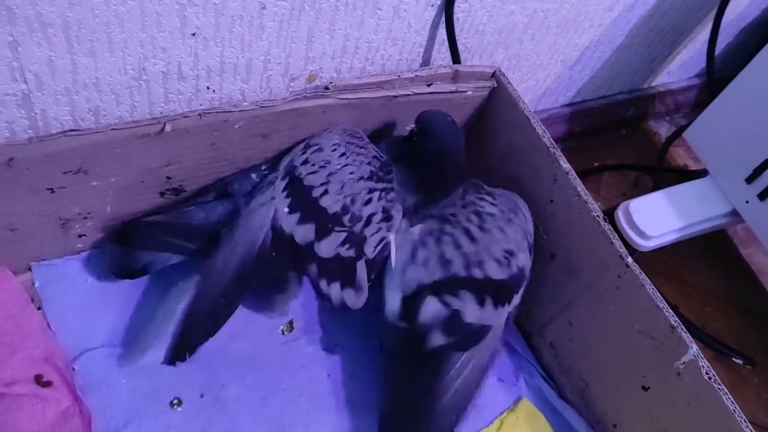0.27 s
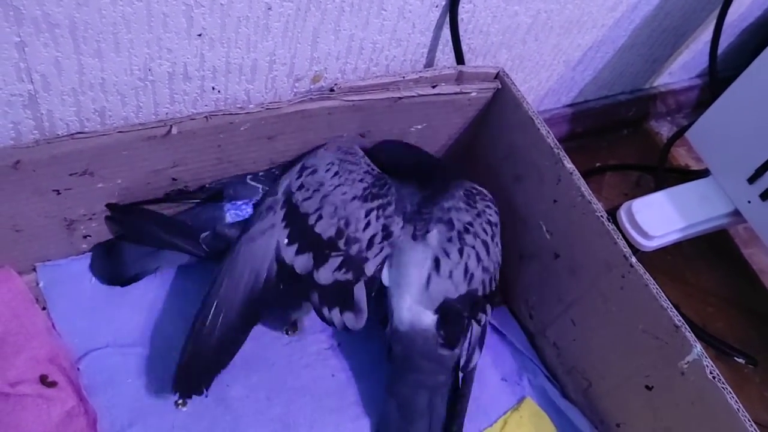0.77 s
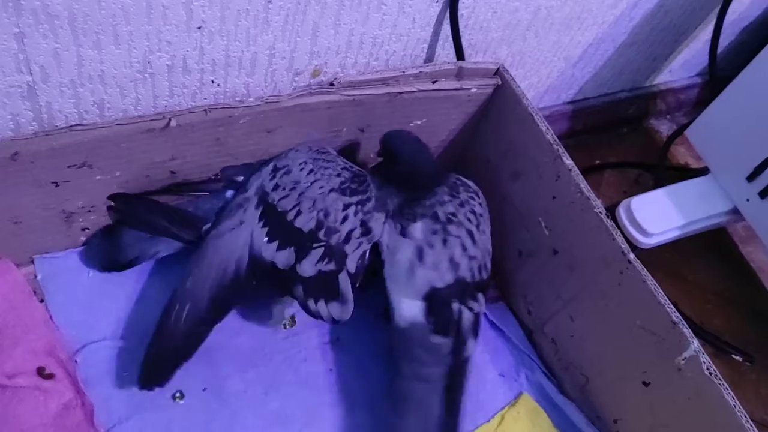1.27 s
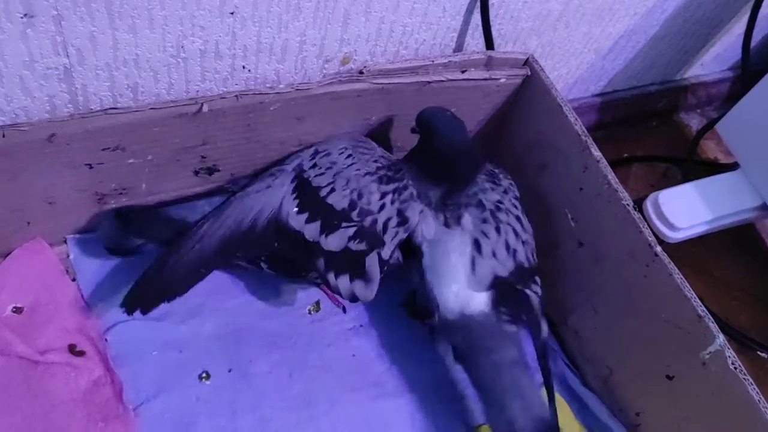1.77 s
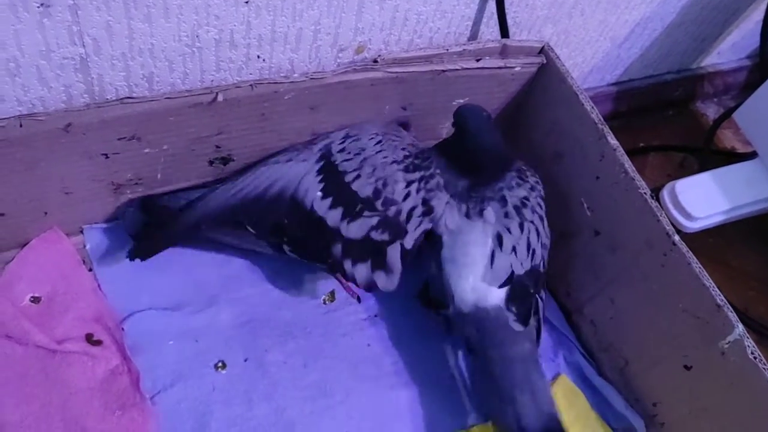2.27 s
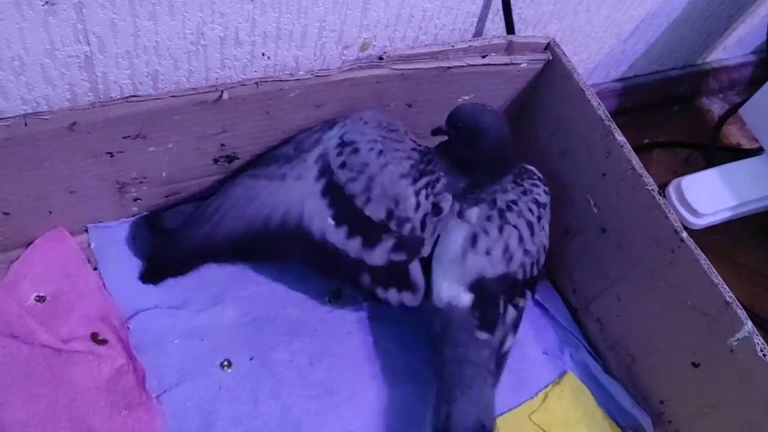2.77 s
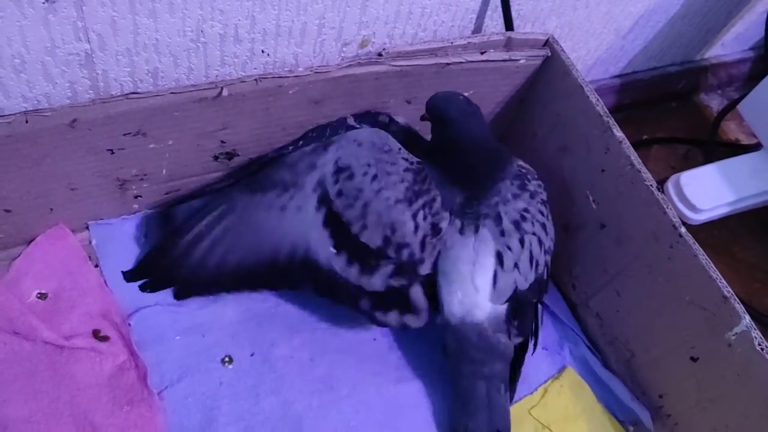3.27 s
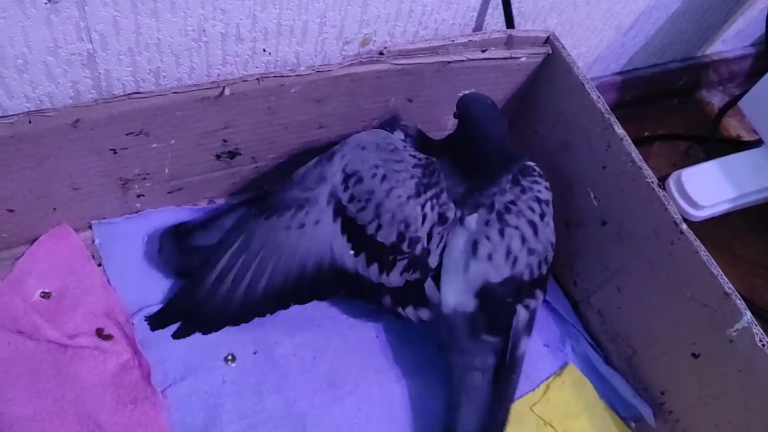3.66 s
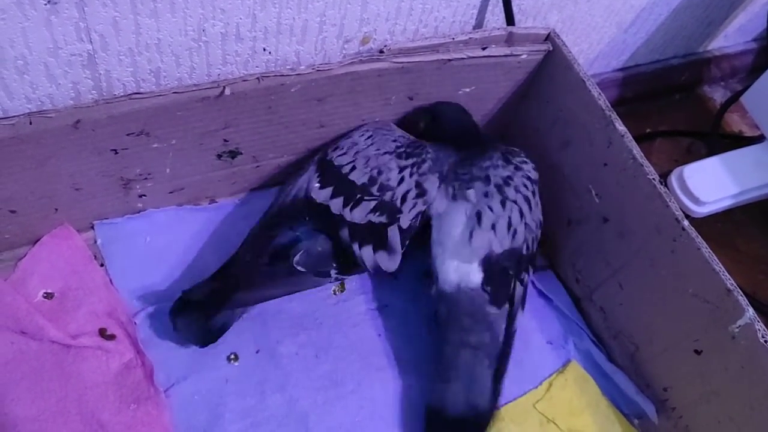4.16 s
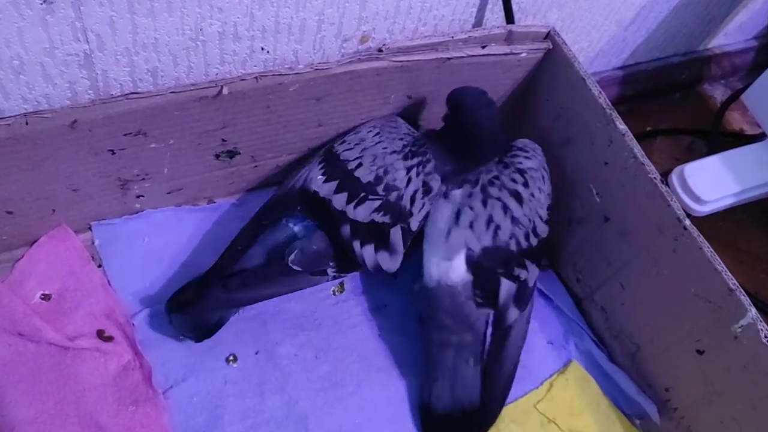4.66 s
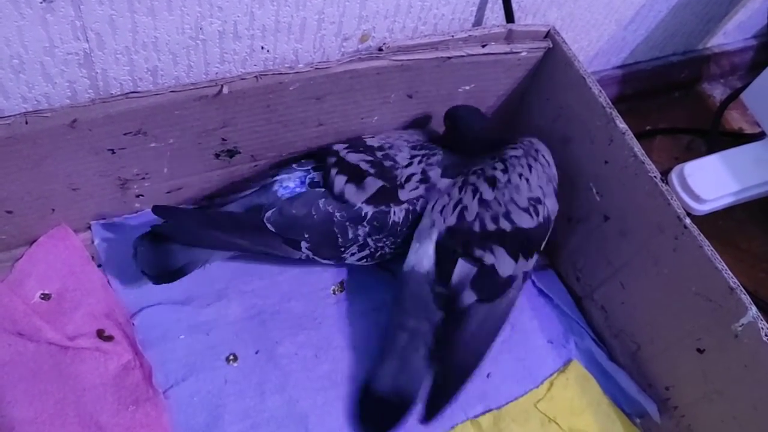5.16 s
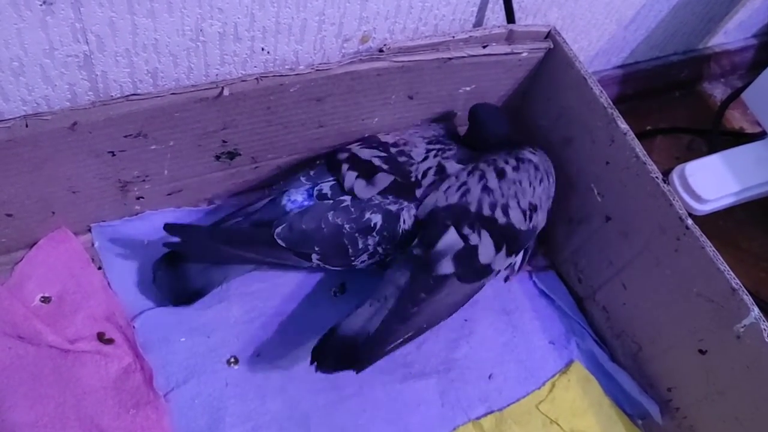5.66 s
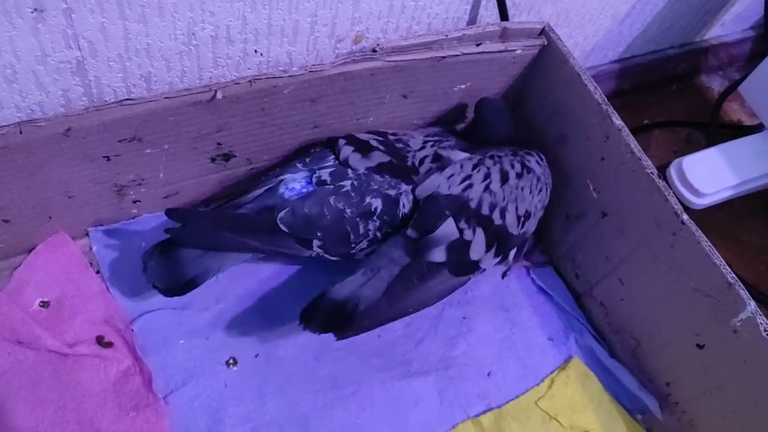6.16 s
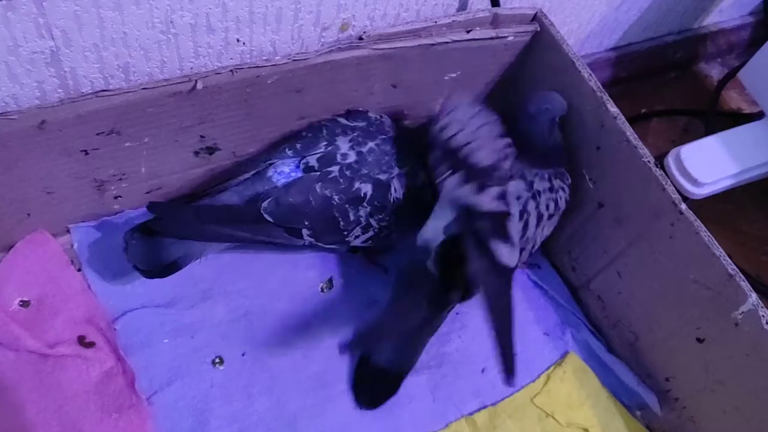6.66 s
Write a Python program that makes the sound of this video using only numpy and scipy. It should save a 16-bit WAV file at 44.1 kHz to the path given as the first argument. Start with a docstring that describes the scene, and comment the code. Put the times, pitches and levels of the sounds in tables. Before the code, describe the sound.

Two pigeons scuffle in a cardboard box, wings slapping and feathers hissing over hollow knocks and hoarse low coos, with bumps on the microphone.

```python
"""Two pigeons wrestle in the corner of a cardboard box in a small room.
Their feathers rub as grainy, patchy hiss; wings and claws swish, knock, crunch and scratch the ringing cardboard.
One bird gives short, hoarse, low coos: a few wavering partials with growl and raspy breath noise.
The hand-held recorder has a right port that rings in the treble; its left port is dull.
A finger bumps on the left port with falling thuds and creeps over it, and the grip rumbles."""
import sys
import numpy as np
from scipy import signal
from scipy.fft import rfft, irfft, next_fast_len
from scipy.io import wavfile

SR = 44100
rng = np.random.default_rng(int(sys.argv[2]) if len(sys.argv) > 2 else 0)


def output_pcm(signal):
    """Save a mono or channel-first signal as 16-bit PCM at the path in sys.argv[1].

    Samples are clipped to [-1, 1] before scaling.
    """
    pcm = np.clip(np.atleast_2d(signal).T, -1, 1) * 32767
    wavfile.write(sys.argv[1], SR, np.round(pcm).astype(np.int16))


N = 304731
TIME = np.arange(N) / SR   # seconds

# All levels in the tables are relative within their layer; the colours and mix gains come on top.

# Spectrum of the room tone: (frequency [Hz], level [dB])
ROOM_TONE_COLOUR = [(20, -29), (90, -46), (160, -48), (300, -61.5), (500, -52), (1000, -63), (3000, -70.5),
                    (8000, -81.5), (16000, -99.5)]
# Grip on the recorder, tightening towards the end: (time [s], rumble level [dB])
GRIP = [(0.0, -58.5), (5.7, -55), (5.92, -40), (6.15, -51), (6.74, -44), (6.91, -43.5)]
# Spectrum of the grip rumble: (frequency [Hz], level [dB])
RUMBLE_COLOUR = [(12, 20.5), (30, 40), (50, 31.5), (90, 24), (160, 17), (250, 12.5), (500, -7.5),
                 (1200, -26.5), (4000, -40)]
# Finger bumps on the left port: (time [s], level [dB], start pitch [Hz], decay constant [s])
FINGER_BUMPS = [(2.157, -22.5, 245, 0.017), (2.582, -24.5, 407, 0.022), (3.578, -29.5, 380, 0.022),
                (3.603, -27.5, 132, 0.028), (4.149, -32, 125, .038), (4.285, -37, 282, 0.039),
                (4.63, -29.5, 87.6, .035), (4.676, -36.5, 166, 0.016), (5.288, -34.5, 139, 0.036),
                (5.595, -31, 70, 0.018), (5.789, -4.5, 490, 0.009), (5.841, -19, 760, 0.03),
                (5.8769, -18.5, 730, 0.016), (5.956, -19.5, 767, 0.022), (6.77, -28.5, 270, 0.022),
                (6.831, -23.5, 180, 0.0089), (6.905, -15, 480, 0.03)]
# Finger over the left port: (time [s], covered share [0-1])
FINGER_COVER = [(0, 0), (3.6, 0.41), (4.3, 0.74), (5.6, 0.47), (6.9, 0.95)]
# Response of the open left port: (frequency [Hz], gain [dB])
LEFT_PORT_COLOUR = [(100, 0), (400, 7), (700, 5.5), (1050, 2.5), (1500, -3.5), (2500, -3), (4000, -7),
                    (7000, -11), (10000, -12.5), (14000, -3), (16000, -23)]
# Coos: (time [s], length [s], pitch before bending [Hz], level [dB], rasp relative to the tone [dB])
COOS = [(1.47, .35, 209, -48, -10), (2.02, .31, 210, -49, -7), (2.65, .35, 194, -54, -5.5),
        (3.61, .21, 216.1, -51, -7.5), (5.718, .34, 226, -50.5, -6), (6.35, .36, 211, -49.5, -7.5)]
# Partials of a coo: (multiple of the pitch [ratio], level [dB])
COO_PARTIALS = [(1, -3.5), (2, -19), (3, -34)]
# Resonances of the cardboard box: (frequency [Hz], level [dB], decay by 60 dB [s])
BOX_MODES = [(97.8, 1, 0.16), (162.3, -3, 0.31), (191.7, 5, 0.072), (259, 2.5, 0.095), (317, -4.5, 0.2),
             (596, -2.5, 0.098), (624, 12.5, 0.0082), (710, 0.5, 0.074), (796, 2, 0.046), (995, -4.5, 0.1),
             (1160, -9, 0.088), (1330, 1, 0.019), (1780, -5, 0.018), (2660, 9.5, 0.011)]
# Spectrum of the cardboard crunch: (frequency [Hz], level [dB])
CRUNCH_COLOUR = [(100, -17), (300, -2.5), (550, 11), (750, 9), (1050, 4.5), (1400, 5.5), (2000, 6),
                 (3200, 1), (6000, -12), (16000, -42.5)]
# Claws and beaks scratching the cardboard: (time [s], level [dB], pitch [Hz])
SCRATCHES = [(0.128, -29.5, 2030), (0.335, -42, 1990), (0.675, -45, 1510), (1.138, -24.5, 743),
             (1.285, -46, 1635), (1.401, -45.5, 1086), (1.551, -42.5, 2960), (1.777, -39.5, 1590),
             (3.754, -51.5, 4240), (4.898, -54.5, 6200), (5.105, -57, 2150), (5.983, -40.5, 1360),
             (6.178, -38.5, 1500)]
# Wing strokes and pecks; length is the rise time plus the decay constant of the swish:
# (time [s], length [s], feather swish [dB], knock on the wall [dB], thump of the box [dB])
WING_STROKES = [(0.118, 0.0091, -23.5, -34, -26.5), (0.32, 0.011, -33.5, -39.5, -35),
                (0.671, .03, -60, -58, -70), (0.808, 0.031, -41.5, -65, -51.5),
                (1.135, 0.0048, -18, -29.5, -34), (1.305, .016, -39.5, -45.5, -41),
                (1.463, 0.018, -38.5, -43.5, -44.5), (1.551, 0.0056, -32.5, -53, -63),
                (1.776, 0.03, -39.5, -63, -42), (1.993, 0.026, -36.5, -74, -59),
                (2.143, 0.025, -31, -45.5, -39.5), (2.307, 0.023, -33.5, -52.5, -49.5),
                (2.451, 0.015, -28.5, -41, -38), (2.916, 0.013, -27.5, -38.5, -36.5),
                (3.278, 0.036, -37.5, -44, -46), (3.469, 0.01, -35.5, -54.5, -59),
                (3.667, 0.016, -51, -51.5, -49), (3.706, .015, -58, -50.5, -45.5),
                (3.961, 0.029, -50.5, -70, -54), (4.309, 0.013, -44.5, -74, -51.5),
                (4.829, 0.0075, -45.5, -57, -38), (5.652, 0.0099, -43, -74, -54),
                (5.792, 0.016, -45.5, -48.5, -58), (5.939, .018, -46, -53, -51),
                (5.98, 0.0067, -34.5, -49, -43), (6.078, 0.021, -45, -67, -60),
                (6.177, 0.0034, -37.5, -46.5, -38.5), (6.446, 0.0096, -35.5, -74, -57)]
# Spectrum of the wing swishes: (frequency [Hz], level [dB])
SWISH_COLOUR = [(150, -2.5), (700, -1), (2000, -7.5), (4000, -5.5), (7500, -5.5), (10000, -7), (13000, -12),
                (16000, -8)]
# A bird shoves and its feathers rub: (time [s], length before release [s], level [dB])
RUBS = [(0.0, 0.007, -42), (0.142, 0.068, -49.5), (0.235, 0.15, -50), (0.42, 0.011, -50),
        (0.485, .04, -48.5), (0.584, 0.14, -44), (0.796, 0.06, -39), (0.941, 0.042, -48.5),
        (1.045, 0.09, -45.5), (1.142, 0.073, -42.5), (1.274, 0.28, -44), (1.591, 0.22, -47),
        (1.932, 0.1, -49.5), (2.073, .36, -47), (2.457, 0.18, -48), (2.667, 0.12, -56), (2.823, 0.11, -48),
        (2.933, 0.095, -49.5), (3.041, 0.083, -45.3), (3.2, 0.11, -50), (3.299, 0.13, -49),
        (3.468, .03, -40), (3.543, .08, -52), (3.645, 0.13, -49), (3.817, 0.049, -43), (3.923, .05, -51),
        (4.047, 0.078, -54.5), (4.139, 0.036, -50), (4.319, .205, -46.2), (4.579, 0.048, -50.5),
        (4.688, 0.057, -52), (4.825, 0.13, -54), (4.95, 0.11, -47.5), (5.1, 0.031, -52), (5.222, 0.16, -55),
        (5.462, 0.039, -49.5), (5.555, 0.047, -51.5), (5.637, 0.05, -50.5), (5.735, 0.31, -60),
        (6.256, 0.024, -57), (6.357, 0.072, -58.5), (6.488, .225, -48.3), (6.787, 0.027, -56.5)]
# Spectrum of the rubbing feathers: (frequency [Hz], level [dB])
FEATHER_COLOUR = [(80, -75), (200, -3.5), (500, -9), (1000, -6.5), (2000, -10), (4000, -8.5), (6000, -9),
                  (7500, -8), (10000, -11), (13000, -11), (16000, -11)]

BUMP_GLIDE_CYCLES = 2.07   # a thud's pitch falls within a few cycles
# where a typical thud settles; sharper ones settle higher
BUMP_END_HZ, BUMP_TYPICAL_HZ, BUMP_END_FOLLOWS = 82.4, 298, 0.437
RIGHT_PORT_HZ, RIGHT_PORT_WIDTH_HZ = 7340, 810
ROOM_T60_S, ROOM_DB = 0.25, -9
CUTOFF_HZ = 15900
COO_ATTACK_S, COO_RELEASE_S = 0.038, 0.028
COO_SCOOP, COO_SCOOP_S = 0.0802, 0.03016   # the pitch starts this share low and comes up
COO_SAG_HZ_PER_S = 35   # it sinks slowly while held
COO_DROOP, COO_DROOP_S = .25, .05   # and falls by this share as the air runs out
COO_GROWL_DB = 0.5   # line at one and a half times the pitch, before the rasp gain
SWISH_RISE_SHARE = 0.39   # part of a stroke's length spent building up
RUB_ATTACK_S, RUB_RELEASE_S = .014, 0.03
RESTING_DB = -61.5   # feathers merely touching
UNEVEN_DB, UNEVEN_PER_S = 1.62, 55   # wavering of the pressure
# one wing dragged across the other bird's back: peak time, level, time constants either side
SWEEP_S, SWEEP_DB, SWEEP_RISE_S, SWEEP_FALL_S = 6.612, -30, 0.041, 0.023


def from_db(db):
    """Decibels to gain."""
    return 10 ** (np.asarray(db) / 20)


def rms_one(x):
    """Scale to unit rms."""
    return x / np.sqrt(np.mean(x ** 2) + 1e-20)


def in_time(rows):
    """Draw each column of a curve out over every sample."""
    s, *columns = np.transpose(rows)
    return [np.interp(TIME, s, column) for column in columns]


def add(track, s, sound):
    """Mix a sound in from time s on."""
    at = min(round(s * SR), N - 1)
    track[at:at + len(sound)] += sound[:N - at]


def coloured(x, colour):
    """Filter by a curve of frequency and level, interpolated over log frequency."""
    hz, db = np.transpose(colour)
    size = next_fast_len(N)
    bins = np.maximum(np.arange(size // 2 + 1) * SR / size, 1)
    gain = from_db(np.interp(np.log(bins), np.log(hz), db))
    return irfft(rfft(x, size) * gain, size)[:N]


def noise(colour):
    """Steady noise of a given colour."""
    return coloured(rng.standard_normal(N), colour)


def drift(rate):
    """Random wavering with `rate` new values a second, joined by straight lines; unit rms."""
    return rms_one(np.interp(TIME * rate, np.arange(N // 8), rng.standard_normal(N // 8)))


def low_pass(x, hz, order=2):
    """Butterworth low-pass."""
    return signal.sosfilt(signal.butter(order, hz, fs=SR, output="sos"), x + 1e-18)


def ring(x, hz, t60):
    """A two-pole resonator: each unit click starts a dying sine."""
    r = from_db(-60 / (t60 * SR))
    w = 2 * np.pi * hz / SR
    return signal.lfilter([0, np.sin(w)], [1, -2 * r * np.cos(w), r * r], x + 1e-18)


def patchy(x, patchy_db, rate):
    """The colour shifts as the contact moves: three bands swell and fade on their own, the top stays even."""
    out, rest = 0, x
    for hz in (900, 2400, 5500):
        below = coloured(rest, [(hz / np.sqrt(2), 0), (hz, -6), (hz * np.sqrt(2), -40)])
        out = out + below * rms_one(from_db(patchy_db * drift(rate)))
        rest = rest - below
    return out + rest


def room_tone():
    """The quiet room is a steady, mostly low noise."""
    return noise(ROOM_TONE_COLOUR)


def echoes(x, t60, first_s, dull_hz):
    """Dense, dying reflections off the room, drawn afresh for each port."""
    age = TIME[:SR // 2]
    tail = rng.standard_normal(len(age)) * from_db(-60 * age / t60) * (age > first_s)
    tail = tail / np.sqrt(np.sum(tail ** 2))
    return signal.fftconvolve(x, low_pass(tail, dull_hz, order=1))[:N]


def handling(attack_s, lumpy_db, sway_hz, sway_db, sway_s):
    """The grip rumbles; each finger press seals the port, thuds with a falling pitch and sways the case."""
    grip_db, = in_time(GRIP)
    out = from_db(grip_db + lumpy_db * drift(22)) * noise(RUMBLE_COLOUR)
    age = TIME[:SR // 4]
    attack = 1 - np.exp(-(age / attack_s) ** 2)
    sway = from_db(sway_db) * np.exp(-age / sway_s) * np.sin(2 * np.pi * sway_hz * age)
    for s, db, start_hz, decay_s in FINGER_BUMPS:
        glide_s = BUMP_GLIDE_CYCLES / start_hz
        end_hz = BUMP_END_HZ * (start_hz / BUMP_TYPICAL_HZ) ** BUMP_END_FOLLOWS
        # the skin slips, so the seal is unsteady
        slip = rms_one(low_pass(rng.standard_normal(len(age)), 98))
        unsteady = np.exp(.3 * slip * np.minimum(age / .015, 1))
        hz = (end_hz + (start_hz - end_hz) * np.exp(-age / glide_s)) * unsteady
        thud = np.exp(-age / decay_s) * np.sin(2 * np.pi * np.cumsum(hz) / SR)
        add(out, s, -from_db(db) * attack * (thud + sway))
    return out


def left_port(x, covered_hz):
    """Dull by itself, and muffled further as the finger covers it."""
    covered, = in_time(FINGER_COVER)
    x = coloured(x, LEFT_PORT_COLOUR)
    return (1 - covered) * x + covered * low_pass(x, covered_hz, order=1)


def right_port(x):
    """The air in the port is a Helmholtz resonator: flat below, ringing at its pitch."""
    r = np.exp(-np.pi * RIGHT_PORT_WIDTH_HZ / SR)
    poles = np.array([1, -2 * r * np.cos(2 * np.pi * RIGHT_PORT_HZ / SR), r * r])
    return signal.lfilter([poles.sum()], poles, x)


def coo_gestures():
    """Each call swells, holds with a sinking pitch and droops as it fades; gives pitch, loudness and rasp."""
    pitch, loudness, rasp_gain = np.zeros((3, N))
    for s, length, hz, db, rasp_db in COOS:
        age = TIME[:int(length * SR)]
        left = length - age   # time still to go
        bend = 1 - COO_SCOOP * np.exp(-age / COO_SCOOP_S) - COO_DROOP * np.exp(-left / COO_DROOP_S)
        swell = np.minimum(age / COO_ATTACK_S, 1)
        fade = np.minimum(left / COO_RELEASE_S, 1)
        add(pitch, s, (hz - COO_SAG_HZ_PER_S * age) * bend)
        add(loudness, s, from_db(db) * swell * fade)
        add(rasp_gain, s, np.full(len(age), from_db(rasp_db)))
    return pitch, loudness, rasp_gain


def coos(jitter, shimmer_db, throat_hz, throat_t60):
    """A closed-beak call: a wavering low tone, plus growl and breath puffs rasping in the swollen throat."""
    pitch, loudness, rasp_gain = coo_gestures()
    phase = 2 * np.pi * np.cumsum(pitch * (1 + jitter * drift(60))) / SR
    tone = 0
    for multiple, db in COO_PARTIALS:
        tone = tone + from_db(db + shimmer_db * drift(45)) * np.sin(multiple * phase)
    growl = from_db(COO_GROWL_DB + shimmer_db * drift(45)) * np.sin(1.5 * phase)
    puffs = rng.standard_normal(N) * (1 + np.sin(phase))   # one puff a cycle
    rasp = low_pass(ring(np.diff(puffs, prepend=0), throat_hz, throat_t60), 880)
    calling = loudness > 0
    tone = tone / np.std(tone[calling])
    rasp = rasp / np.std(rasp[calling])
    return loudness * (tone + rasp_gain * (growl + rasp))


def scratches(rise_s, fall_s, ring_cycles):
    """A claw or beak skids for a moment and excites a small, well damped patch of wall."""
    out, age = np.zeros(N), TIME[:SR // 12]
    envelope = np.minimum(age / rise_s, 1) * np.exp(-age / fall_s)
    for s, db, hz in SCRATCHES:
        skid = rms_one(ring(np.diff(rng.standard_normal(len(age) + 1)), hz, ring_cycles / hz))
        add(out, s, from_db(db) * skid * envelope)
    return out


def crunch(rise_s, fall_s, shudder_db, shudder_s):
    """Struck cardboard gives way with a dry crunch, then the loose walls shudder briefly."""
    envelope, age = np.zeros(N), TIME[:SR // 3]
    dying = np.exp(-age / fall_s) + from_db(shudder_db) * np.exp(-age / shudder_s)
    shape = np.minimum(age / rise_s, 1) * dying
    for s, _, _, knock_db, _ in WING_STROKES:
        add(envelope, s, from_db(knock_db) * shape)
    return envelope * patchy(noise(CRUNCH_COLOUR), patchy_db=3.5, rate=48)


def box(knock_lag_s, spread_s, scatter_db, level_db):
    """The wrist of the wing knocks the wall's upper modes; the bird's weight thumps the low ones."""
    hz, mode_db, t60 = np.array(BOX_MODES).T[:, :, None]
    hardness = np.clip(np.log2(hz / 280), 0, 1)   # 0: all thump, 1: all knock
    sign = (-1) ** np.arange(len(BOX_MODES))[:, None]   # neighbouring modes swing opposite ways
    out = np.zeros(N)
    for s, _, _, knock_db, thump_db in WING_STROKES:
        blow_db = hardness * knock_db + (1 - hardness) * thump_db
        strength = from_db(blow_db + mode_db + scatter_db * rng.standard_normal(hz.shape))
        loaded_hz = hz * (1 + .03 * rng.standard_normal(hz.shape))   # leaning birds detune the walls
        # each mode starts at its own moment
        age = np.maximum(TIME[:SR // 5] - spread_s * rng.random(hz.shape), 0)
        decay = np.exp(-np.log(1000) * age / t60)
        modes = strength * decay * sign * np.sin(2 * np.pi * loaded_hz * age)
        add(out, s + knock_lag_s, np.sum(modes, axis=0))
    return from_db(level_db) * out


def swishes(grain_db):
    """In each stroke the flight feathers sweep in, land one after another and slide off: a swell of noise."""
    envelope, age = np.zeros(N), TIME[:SR // 4]
    for s, length, swish_db, _, _ in WING_STROKES:
        rise_s = SWISH_RISE_SHARE * length
        fall_s = (1 - SWISH_RISE_SHARE) * length
        swell = np.minimum(age / rise_s, 1) * np.exp(-np.maximum(age - rise_s, 0) / fall_s)
        add(envelope, s, from_db(swish_db) * swell)
    grain = rms_one(from_db(grain_db * drift(1200)))
    return envelope * grain * patchy(noise(SWISH_COLOUR), patchy_db=7.0, rate=67)


def rubbing():
    """Rubbing strength: shoves build, hold and let go above a light contact; one wing sweep adds to it."""
    power = np.full(N, from_db(RESTING_DB) ** 2)
    for s, length, db in RUBS:
        near = slice(max(int((s - .1) * SR), 0), int((s + length + .2) * SR))
        age = TIME[near] - s
        build = (1 + np.tanh(age / RUB_ATTACK_S)) / 2
        let_go = np.exp(-np.maximum(age - length, 0) / RUB_RELEASE_S)
        power[near] += (from_db(db) * build * let_go) ** 2
    pressure = np.sqrt(power) * from_db(UNEVEN_DB * drift(UNEVEN_PER_S))
    from_peak = np.maximum((SWEEP_S - TIME) / SWEEP_RISE_S, (TIME - SWEEP_S) / SWEEP_FALL_S)
    sweep = from_db(SWEEP_DB) * np.exp(-from_peak)
    return np.hypot(pressure, sweep)


def feathers(grain_db, flutter_db, patchy_db, catches_per_s, catch_db):
    """Barbs slide over each other: a grainy hiss, with single quills catching and snapping free."""
    grain = from_db(grain_db * drift(900) + flutter_db * drift(70))
    hiss = rms_one(grain) * rng.standard_normal(N)
    catches = (rng.random(N) < catches_per_s / SR) * rng.standard_normal(N)
    rub = coloured(hiss + from_db(catch_db) * rms_one(catches), FEATHER_COLOUR)
    return rubbing() * patchy(rub, patchy_db, rate=70)


def at_a_port(body):
    """Feathers sound from all over both birds, so each port hears its own hiss; body sounds are shared."""
    rub = feathers(grain_db=0.5, flutter_db=2.3, patchy_db=2.0, catches_per_s=160, catch_db=-11.5)
    birds = body + rub + swishes(grain_db=1.5)
    return birds + from_db(ROOM_DB) * echoes(birds, ROOM_T60_S, first_s=0.0026, dull_hz=5500)


def scene():
    """The birds and their room as heard through the two ports, with the hand on the left one."""
    body = box(knock_lag_s=0.00253, spread_s=0.00373, scatter_db=1.0, level_db=-5.0)
    body = body + crunch(rise_s=0.011, fall_s=0.010, shudder_db=-8.5, shudder_s=0.038)
    body = body + scratches(rise_s=0.0015, fall_s=0.0069, ring_cycles=7.9)
    body = body + from_db(-4.5) * coos(jitter=0.04, shimmer_db=5.5, throat_hz=242, throat_t60=0.023)
    # the left port hears the birds 8 samples late
    left = left_port(np.roll(at_a_port(body), 8), covered_hz=386)
    left = left + handling(attack_s=0.0015, lumpy_db=2.5, sway_hz=72.2, sway_db=-17.0, sway_s=0.054)
    right = right_port(at_a_port(body))
    return np.array([left + room_tone(), right + room_tone()])


def record(dry):
    """A steep elliptic low-pass cuts off the top."""
    return signal.sosfilt(signal.ellip(10, .2, 80, CUTOFF_HZ, fs=SR, output="sos"), dry)


dry = scene()
out = record(dry)
output_pcm(out)
```